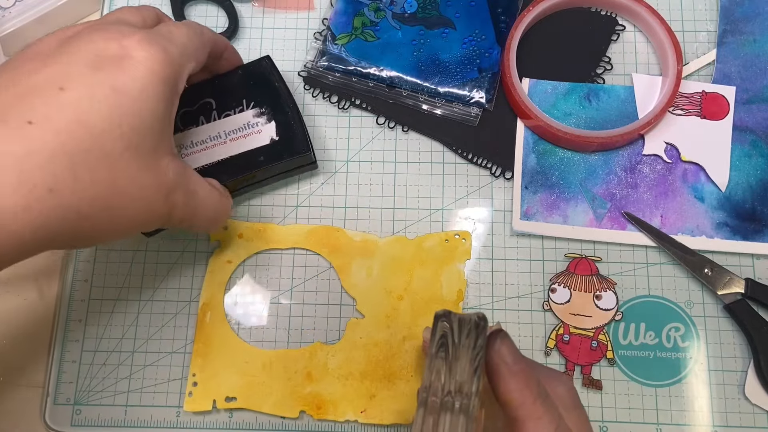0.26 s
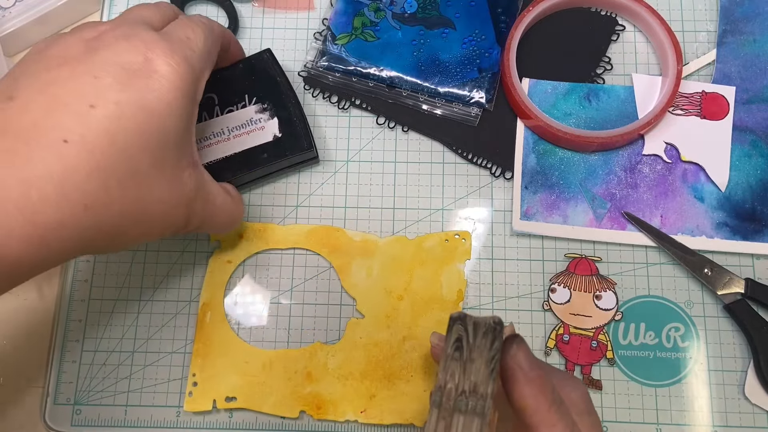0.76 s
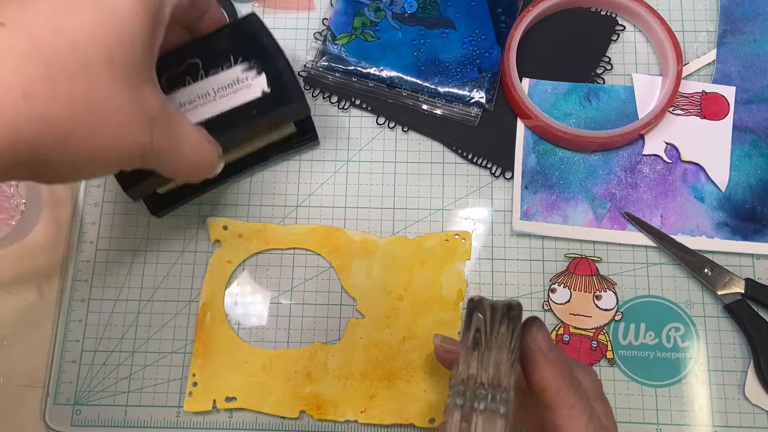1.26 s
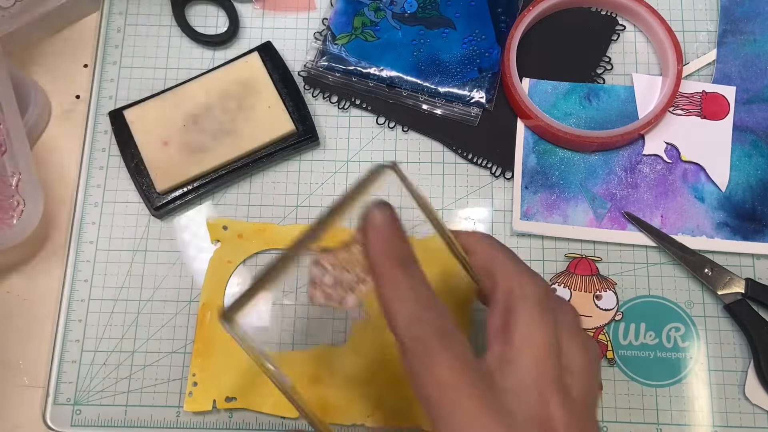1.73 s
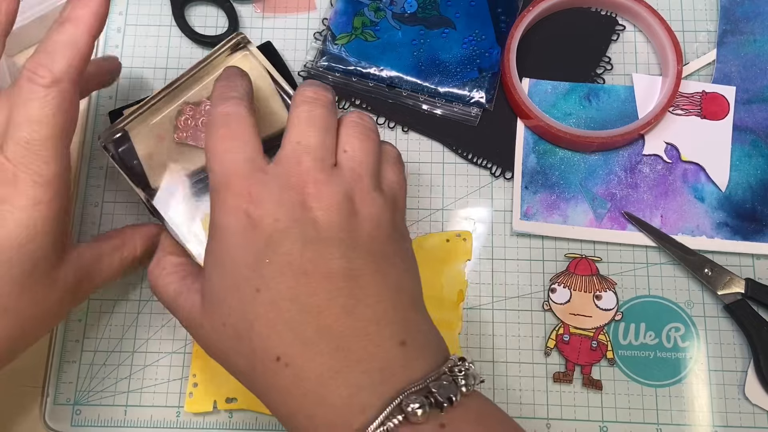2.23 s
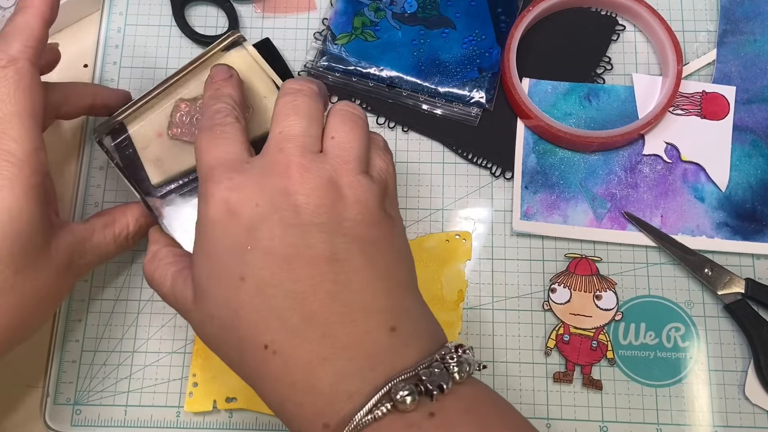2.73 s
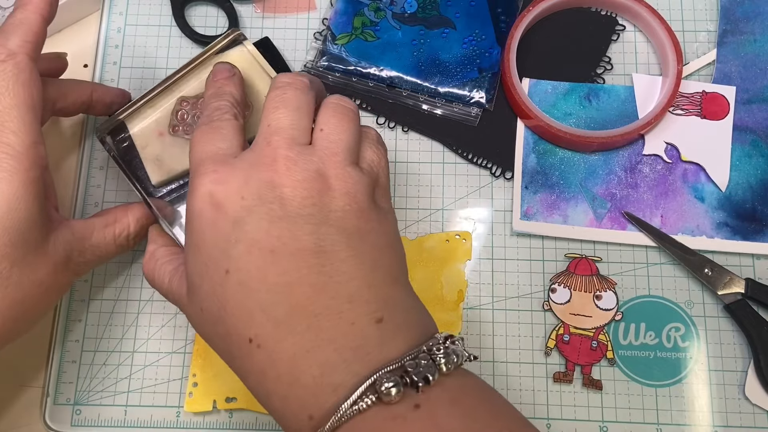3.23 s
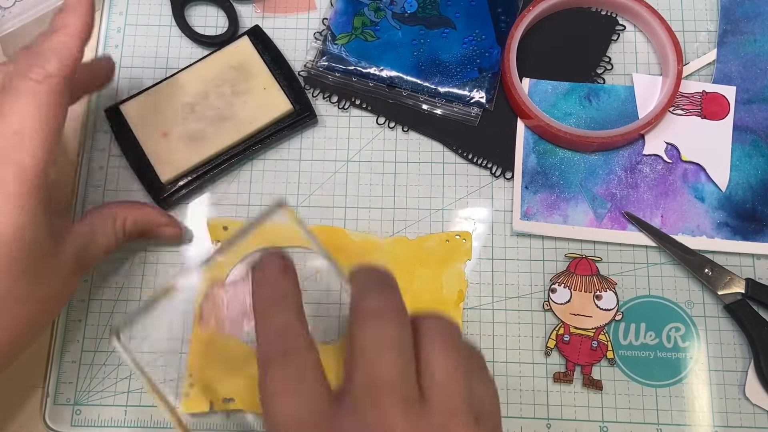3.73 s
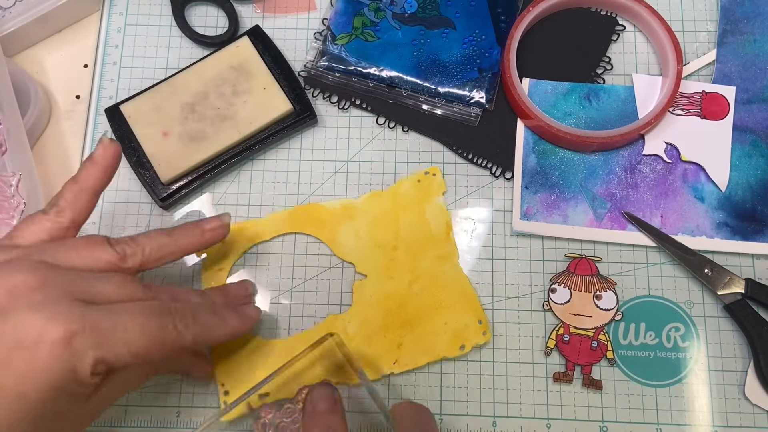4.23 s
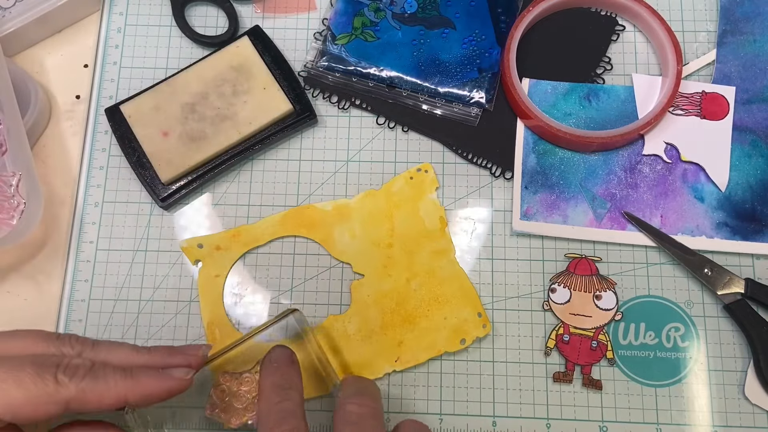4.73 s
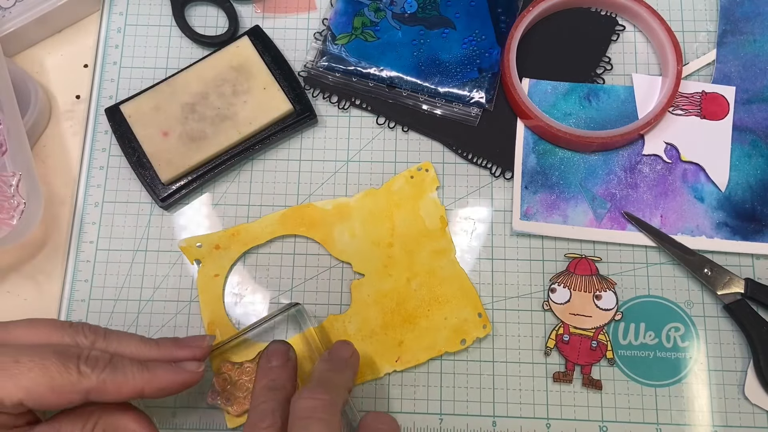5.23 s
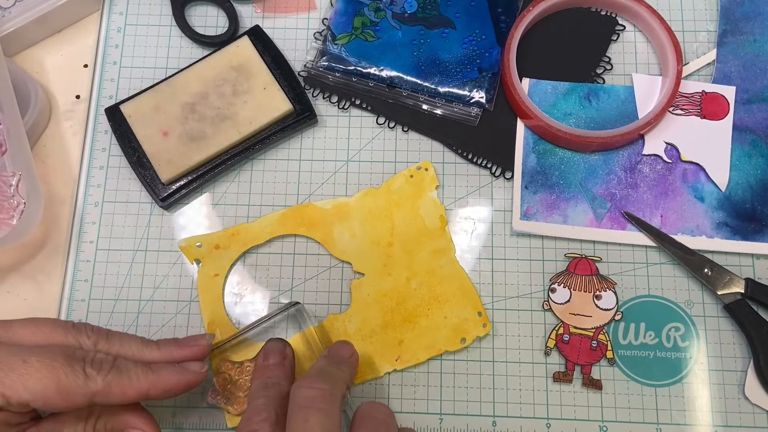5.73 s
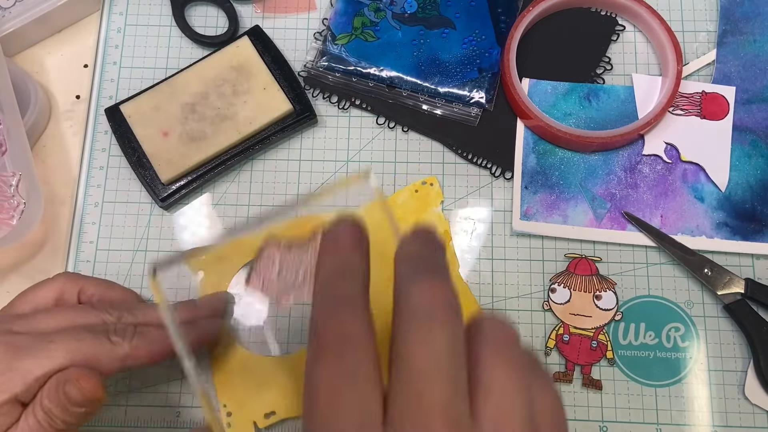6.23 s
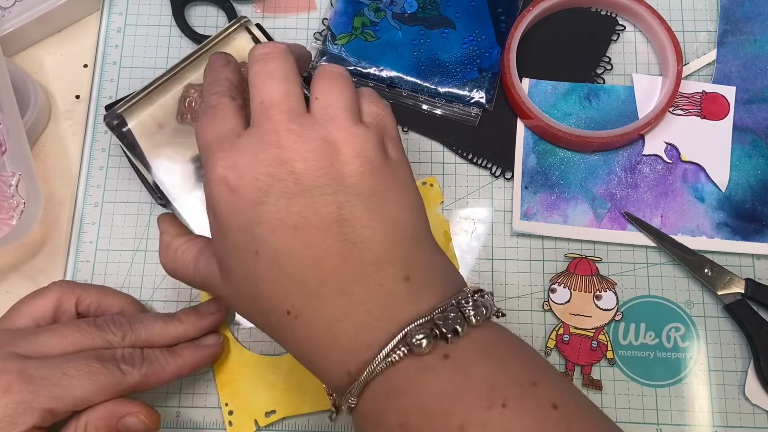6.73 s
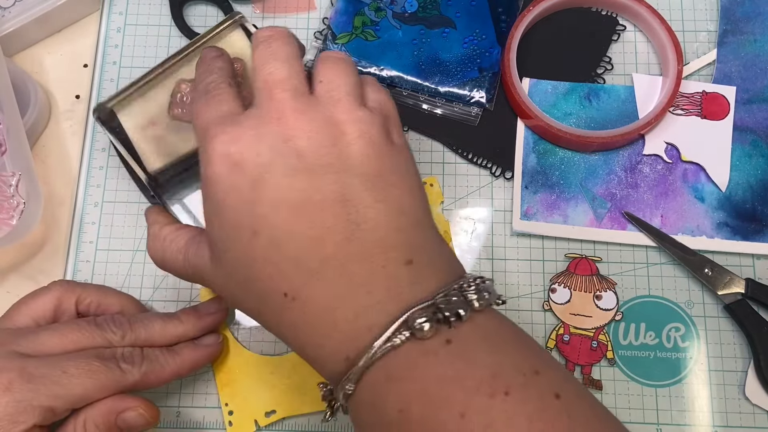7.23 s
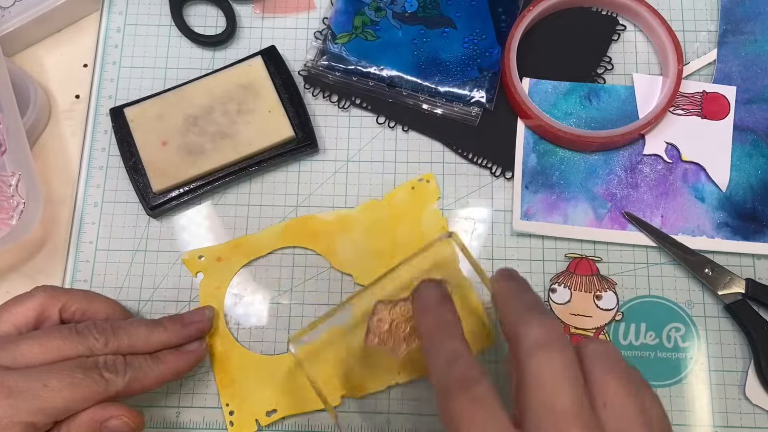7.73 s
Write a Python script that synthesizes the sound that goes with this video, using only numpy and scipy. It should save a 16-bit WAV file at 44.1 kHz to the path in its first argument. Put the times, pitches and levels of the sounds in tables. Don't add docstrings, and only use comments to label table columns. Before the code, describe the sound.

Close microphone on a craft desk. Faint handling taps, then crisp plastic cracks with low desk thuds, followed by a lid clattering and settling within a third of a second. Light cloth brushing and tiny metal ticks fill the gaps. A clear block lands lightly, later knocks hard once; bracelet links scrape and snap, then the block clicks, rubs briefly and double-knocks the rim. Low room air throughout, short dry echo.

```python
import sys
import numpy as np
from scipy import signal
from scipy.fft import rfft, irfft, next_fast_len
from scipy.io import wavfile
from scipy.ndimage import uniform_filter1d

SR = 44100
rng = np.random.default_rng(int(sys.argv[2]) if len(sys.argv) > 2 else 0)


def wrap_up_sound(samples):
    columns = np.atleast_2d(samples).T
    tamed = np.clip(columns, -1, 1)
    steps = np.round(tamed * 32767).astype(np.int16)
    wavfile.write(sys.argv[1], SR, steps)


def decibels_to_gain(level_db):
    exponent = np.asarray(level_db, float) / 20
    return 10 ** exponent


N = 351918
HELD_T60, FREE_T60 = .022, .07

# (t/s, peak level/dB, body level/dB, edge level/dB, hollow f/Hz)
PRIES = [
    (1.031, -61, 22.12, -5, 866),
    (1.0375, -57, 28.78, -11, 890),
    (1.0405, -51, 29, -12, 880),
]
# (t/s, peak level/dB, body level/dB, edge level/dB, hollow f/Hz)
CASE_KNOCKS = [(0.1102, -34.5, 10.5, -42, 1860), (0.117, -42.5, 15, -36, 1980),
               (0.3043, -42, 10, -46, 1980), (1.1825, -16, 3.5, -1.5, 1494), (1.1853, -17, 5, -5, 1620),
               (1.1995, -31.5, 2, -32, 1990), (1.2385, -21.5, 5.5, 1, 1600), (1.2425, -23.5, -4, -4, 1600),
               (1.255, -33.5, 3, -28, 1530), (1.2668, -34.5, -0.5, -5, 1800),
               (1.2718, -25, 7.5, -0.5, 1600), (1.2875, -31.5, 1, -1, 1496), (1.2922, -21.5, 5.5, -7, 1647)]
# (f/Hz, level/dB, t60/s)
CASE_RING = [(790, -6, .02), (1130, -6, .03), (1610, 0, .03), (1990, -5, .03), (2700, -7, .02),
             (3160, -6, .025), (3950, -2, .014), (4500, -5, 0.014), (5400, -6, .02), (6200, -8, .022),
             (8400, -12.5, .02), (10000, -7.5, .02)]
# (t/s, peak level/dB, body level/dB, edge level/dB, hollow f/Hz)
LID_DROP = [
    (1.6908, -12.5, -12, -2, 1130),
    (1.6933, -14, -2, -5.5, 1000),
    (1.6978, -21, -12, -10, 1520),
    (1.7057, -18.5, -10.5, -15, 1130),
]
# (f/Hz, level/dB, t60/s)
DROP_RING = [(890, -10, .03), (1135, -8, .045), (1520, -8, .03), (2024, -7, .05), (2400, -7, .05),
             (2732, -7, .05), (3000, -2, .015), (3370, -7, .05), (3730, 6, .018), (5233, -6, .04),
             (5706, -5, .04), (6207, -8, .04), (9615, -7, .04), (9959, -5, .04)]
# (t/s, peak level/dB, body level/dB, edge level/dB, hollow f/Hz)
LID_TIPS = [
    (1.7405, -20.5, -9, -36, 1500),
    (1.7515, -33, -8, -34.5, 870),
    (1.7655, -29, -6, -36.5, 1500),
]
# (f/Hz, level/dB, t60/s)
TIP_RING = [(861, -4, .07), (1104, -6, .06), (2089, -7, .045), (2762, -1, .05), (3144, -4, .06),
            (3763, -7, .06), (3941, 0, .03), (4544, -1, .04), (5722, -6, .06), (8452, -14, .03),
            (9798, -12, .03)]
# (t/s, peak level/dB, body level/dB, edge level/dB, hollow f/Hz)
LID_BOUNCES = [
    (1.7835, -11, -7, -1.5, 1896),
    (1.8038, -11.5, -8, -10, 1130),
    (1.8304, -19.5, -12, -17, 1418),
    (1.8345, -23.5, -15, -19.5, 1450),
    (1.844, -33, -12, -19, 1463),
]
# (f/Hz, level/dB, t60/s)
BOUNCE_RING = [(1130, -11, .025), (1950, -6, .03), (2850, -11, .025), (3110, -6, .03), (3378, -4, .06),
               (3900, -7, .02), (5050, -5, .055), (5730, -3, .04), (6240, -7, .045), (8530, -12, .03),
               (9150, -10, .04), (5980, -6, .04), (7090, -6, .03), (11500, -12, .02)]
# (t/s, peak level/dB, body level/dB, edge level/dB, hollow f/Hz)
LID_RESTS = [
    (1.8638, -21.5, -7.5, -22, 1950),
    (1.8722, -17.5, -11, -10, 1980),
    (1.888, -34, -7, -23, 1950),
    (1.9045, -23.5, -7, -15, 2000),
    (1.92, -35.5, -5, -29, 1950),
]
# (f/Hz, level/dB, t60/s)
REST_RING = [(1130, -1.5, .03), (2020, -3.5, .03), (2790, -2.5, .03), (3590, 4, 0.025), (4140, -3, .03),
             (4800, -9, .03), (5868, 0, .03), (6480, -3, .03), (8470, -10, .03), (10240, -15.5, .03),
             (12320, -15.5, .03)]
# (t/s, peak level/dB, body level/dB, edge level/dB, hollow f/Hz)
LID_TOUCHES = [
    (1.6405, -53, 7, -24.5, 1400),
    (1.9424, -49.5, 8.5, -35, 1600),
    (1.9785, -34, -2.5, -45.5, 1960),
    (1.992, -48, 4, -34, 1920),
    (2.012, -52.5, 9.5, -32, 1900),
    (2.033, -54, 2.5, -33, 1190),
    (2.07, -51, -0.5, -32, 1170),
]
# (f/Hz, level/dB, t60/s)
TOUCH_RING = [(800, -9.5, .03), (1130, -4, .03), (2060, 1, .03), (2680, -2, .03), (3150, -2, .03),
              (3750, -3, .02), (4550, -4.5, .03), (5230, -5, .03), (5700, -5, .03), (8860, -14, .03),
              (10018, -6, .03), (11400, -6.5, .03)]
# (t/s, peak level/dB, body level/dB, edge level/dB, hollow f/Hz)
BLOCK_FLAT = [
    (2.7043, -25, 8, 2, 1117),
    (2.7085, -30, -4, -5.5, 1156),
    (2.7135, -36, 4.5, -9, 1124),
]
# (f/Hz, level/dB, t60/s)
FLAT_RING = [(790, -5, .02), (1146, 0, .03), (1345, -6, .02), (1880, -3, .02), (2400, -6, .02),
             (2690, -4, .02), (3170, -6, .03), (3450, -5, .03), (3890, -1, .02), (4410, -5, .03),
             (5120, -4, .03), (8090, 1, .03), (9630, -4.5, .03), (11460, -6, .03)]
# (t/s, peak level/dB, body level/dB, edge level/dB, hollow f/Hz)
BLOCK_KNOCKS = [
    (3.5028, -11.5, -1, -2.5, 1492),
    (3.5075, -24, 0.5, 4, 1600),
    (3.5149, -20, 0.5, -4, 790),
    (4.9926, -55, 6.5, -35, 1193),
    (5.2195, -68.5, 19, -29, 1197),
]
# (f/Hz, level/dB, t60/s)
BLOCK_RING = [(790, -4.5, .03), (1130, -5.5, .03), (1600, -4, .03), (1860, 0, .03), (2400, -1, .03),
              (2726, 0.5, .03), (3460, -8, 0.022), (4000, 5.5, .012), (4756, -9, .015), (5600, -3, 0.03),
              (6600, -5, .02), (8430, -6, .03), (10030, -6.5, .03), (11500, -3, .03)]
# (t/s, peak level/dB, body level/dB, edge level/dB, hollow f/Hz)
BLOCK_CORNER = [
    (6.9422, -52, 9, -28.5, 1557),
    (7.048, -67.5, 22, -35, 1500),
    (7.0675, -18.5, 6, -2.5, 1530),
    (7.072, -28, -6, 1, 1860),
]
# (f/Hz, level/dB, t60/s)
CORNER_RING = [(770, -9, .03), (1178, -8, .03), (1504, -0.5, .03), (1924, 4, .02), (2890, -9, .02),
               (3200, -12, .015), (3720, 2, .014), (4094, 2, .012), (4730, -5, .015), (5580, -5, .02),
               (8550, 2, .03), (9900, -4, .03)]
# (t/s, peak level/dB, body level/dB, edge level/dB, hollow f/Hz)
RIM_KNOCKS = [
    (7.3836, -8.5, -11, -13, 1700),
    (7.394, -9, -7, -9.5, 1857),
    (7.4015, -23, -8.5, -13.5, 2020),
]
# (f/Hz, level/dB, t60/s)
RIM_RING = [(795, 0, .03), (1125, -14, .02), (1650, -6, .02), (2030, -1, .022), (2460, -2, .015),
            (2875, -5, .03), (3480, -5, .015), (3930, 3, .016), (4250, 1, .012), (5170, -1, .025),
            (5600, -6, .015), (6660, -10, .015), (8500, -10, .03), (9900, -9, .03)]
# (t/s, peak level/dB, body level/dB, edge level/dB, hollow f/Hz)
RIM_SETTLES = [(7.4205, -28.5, -12.5, -25, 2100), (7.4255, -25, -5, -20, 2070),
               (7.441, -25.5, -7, -14, 1630), (7.4445, -24, 0.5, 0, 1710), (7.4475, -25, -3.5, -2.5, 1600),
               (7.4525, -28.5, -4, -14, 1900), (7.4625, -37.5, 1, -21, 1610), (7.469, -41.5, 2, -21, 1790)]
# (f/Hz, level/dB, t60/s)
SETTLE_RING = [(797, -6, .03), (1600, -4, .02), (1938, -2, .02), (2860, -2, .03), (3400, -3, .02),
               (3680, -2, .02), (4600, -5, .015), (5400, -7, .02), (5840, -5, .02), (8500, -11, .03),
               (9615, -13, .03), (9960, -10, .03), (11500, -10, .03)]
# (f/Hz, level/dB)
SQUEAL_NOTES = [(2120, 0), (3500, -10), (4250, -8), (5300, -6)]
# (f/Hz, level/dB, t60/s)
DESK_RING = [(788, 0, .06), (1135, -1, .05), (1605, -2, .045), (1865, -2, .045), (2025, -5, .04),
             (2730, -7, .04), (2865, -4, .045), (3150, -5, .04), (3945, -7, .03), (5230, -8, .03),
             (8400, -2, .03), (9615, -2, .04), (9958, -4, .04)]
# (t/s, peak level over 7.5 kHz/dB, lower level/dB)
CHARM_TICKS = [(2.0582, -45, -1), (2.081, -40.5, -11), (2.0954, -56, 11), (2.2583, -46.5, -3.5),
               (3.1087, -59.5, -9), (3.1892, -61.5, -5.5), (3.3226, -60, -10), (3.7534, -52, -3.5),
               (5.1278, -53, -2), (6.1567, -48, -25), (6.1784, -58, -7.5), (6.2532, -52, -5),
               (6.3261, -57, -8.5), (6.4513, -50.5, -8.5), (6.474, -58.5, -3), (6.5046, -55, -11.5),
               (6.5514, -53, -16), (6.6288, -61, -11.5), (7.2604, -56.5, -2.5), (7.2877, -54.5, -3),
               (7.5945, -56, -4), (7.6045, -56.5, -8), (7.6833, -62, -1), (7.7056, -51.5, -15),
               (7.7445, -60.5, -11), (7.8344, -69.5, -1)]
# (t/s, peak level over 7.5 kHz/dB, lower level/dB, desk knock level/dB)
BRACELET_DRAG = [(5.8621, -36, -8, -9.5), (5.93, -44, -13, -25.5), (5.9373, -39.5, 0.5, -31),
                 (5.9425, -29.5, -8, -9), (5.9575, -44, -5, -25), (5.969, -30, -29, -22),
                 (5.9787, -34, -10, -25), (5.9818, -29, -8, -18), (5.991, -32, -6, -20),
                 (6.0365, -55, 3, -7), (6.0405, -46, -16, -8)]
# (t/s, peak level over 7.5 kHz/dB, lower level/dB, desk knock level/dB)
SNAPS = [
    (5.9848, -19, -7, -10),
    (7.7569, -35, -14, -30),
]
# (t/s, peak level/dB, f/Hz, t60/s)
THUDS = [(1.051, -28.5, 74, 0.08), (1.189, -22.5, 67, 0.12), (1.241, -23, 65, 0.17),
         (1.289, -34.5, 63, 0.16), (1.699, -33, 69, 0.25), (1.798, -38, 61, 0.27), (1.883, -41, 66.5, 0.13),
         (2.266, -40, 85.3, 0.19), (2.708, -31.5, 107.7, 0.12), (3.514, -19, 72, 0.086),
         (5.024, -42.5, 73.6, 0.31), (5.14, -31.5, 64.9, 0.16), (5.175, -40, 110, 0.12),
         (5.229, -45, 79.7, 0.18), (5.954, -36, 76, 0.27), (6.67, -33, 81, 0.21), (6.715, -42, 105, .13),
         (7.07, -35, 102.5, 0.062), (7.404, -34, 70.6, 0.24)]
# (middle t/s, length/s, level/dB)
STROKES = [(1.116, 0.26, -62.5), (1.483, 0.44, -66), (1.667, 0.12, -53), (2.076, 0.31, -66),
           (2.272, 0.23, -58.5), (2.633, 0.17, -61.5), (3.124, 0.11, -67), (3.33, 0.077, -77),
           (3.458, 0.097, -59.5), (3.641, 0.18, -70), (3.798, 0.6, -64), (4.035, .12, -68),
           (4.176, 0.23, -66.5), (4.509, 0.63, -69.5), (5.121, 0.049, -75), (5.579, 0.095, -86),
           (5.824, 0.15, -68.5), (6.077, 0.095, -74.5), (6.196, 0.16, -65), (6.334, 0.2, -64),
           (6.462, 0.25, -64), (6.57, 0.076, -73.5), (6.703, 0.32, -72), (6.959, 0.22, -67),
           (7.28, 0.16, -67), (7.551, 0.2, -57), (7.72, 0.17, -64), (7.907, .3, -66.5)]
# (f/Hz, level per Hz/dB)
RUSTLE_TONE = [(1500, -30), (4000, -10), (6000, -3), (9000, 0), (12000, 0), (14500, 4), (16000, 5)]
# (f/Hz, t60/s)
ROOM = [(200, 0.62), (1000, 0.086), (3000, 0.18), (6000, 0.135), (12000, 0.095)]
# (f/Hz, level per Hz/dB)
AIR = [(25, -37), (45, -16), (67, 2.5), (90, -10.5), (150, -14), (280, -7), (360, -7.5), (520, -10.5),
       (750, -19), (1000, -26), (2200, -28.5), (5000, -38.5), (8000, -52), (14000, -61)]
# (t/s, level/dB)
AIR_DRIFT = [(0, 2.5), (.8, 1.5), (2.3, 2.4), (3.3, 1.5), (4.1, -0.2), (5, 0.33), (6.2, 1.3), (7.2, 2.4),
             (7.98, 1.5)]
# (f/Hz, width/Hz, level/dB)
NOTCHES = [(7330, 750, -22), (13450, 700, -28), (15500, 5000, -4)]


def evened(x):
    return x / np.sqrt(np.mean(x ** 2) + 1e-20)


def peaked(x):
    return x / np.sqrt(uniform_filter1d(x ** 2, size=128).max() + 1e-20)


def read(points, hz):
    f, value = np.transpose(points)
    return np.interp(np.log(hz + 1), np.log(f + 1), value)


def add(mix, s, sound):
    part = mix[round(s * SR):][:len(sound)]
    part += sound[:len(part)]


def band(x, hz, kind="band"):
    return signal.sosfilt(signal.butter(2, hz, kind, fs=SR, output="sos"), x)


def levelled(grit, shape):
    x = grit * shape
    for _ in range(3):
        z = rfft(x)
        x = irfft(z / (abs(z) + 1e-12))
        x = shape * x / np.sqrt(abs(uniform_filter1d(x ** 2, size=24)) + 1e-14)
    return x


def knocks(rows, modes, crack_db, hollow_db, longest, chatter_ms, swell_db=-25, dull_db=0, wood_db=-30, loose=.35):
    out, t, lead = np.zeros(N), np.arange(3584) / SR, .025
    hz, db, t60 = np.transpose(modes)[:, :, None]
    ring = decibels_to_gain(db - 60 * t / np.clip(t60, .008, longest * np.minimum(1, 5000 / hz)))
    since = np.maximum(t - lead, 0)
    for s, peak_db, body_db, edge_db, hollow_hz in rows:
        spot, phase = rng.standard_normal((2, len(modes), 1))
        grit = rng.standard_normal(len(t)) * decibels_to_gain(3 * rng.standard_normal(len(t)))
        push = np.exp(-1000 * since / chatter_ms) + decibels_to_gain(-15) * np.exp(-since / .015)
        chatter = levelled(grit, push * (1 - np.exp(-since / .0005)))
        blow = 2.1 * chatter / np.linalg.norm(chatter)
        blow += .7 * signal.unit_impulse(len(t), round(lead * SR) + 20)
        notes = ring * decibels_to_gain(1.3 * spot) * np.sin(2 * np.pi * (hz * t + .12 * phase))
        rung = signal.fftconvolve(blow, notes.sum(0))[:len(t)]

        def layer(low, high, dull=0):
            crack = decibels_to_gain(crack_db + low / 1500 + dull) * peaked(band(chatter, [low, high]))
            return peaked(band(rung, [low, high])) + crack

        body, bright, edge = layer(650, 1550, dull_db), layer(1900, 7000), layer(7600, 17000)
        hollow = np.sin(2 * np.pi * hollow_hz * since) * decibels_to_gain(-60 * since / .014)
        hollow = peaked(hollow * (1 - np.exp(-since / .0012)))
        body = peaked(band(body, 620, "high")) + decibels_to_gain(hollow_db) * hollow
        body *= loose + (1 - loose) * np.exp(-since / .0013)
        swell = grit * (t < lead) * np.exp(np.minimum(t - lead, 0) / .0058)
        swell = decibels_to_gain(swell_db) * peaked(band(swell, [1500, 5500]))
        mat = grit * (t > lead) * np.exp(-since / .022)
        mat = decibels_to_gain(wood_db + body_db) * peaked(band(mat, [240, 620]))
        knock = peaked(bright) + swell + mat
        knock -= decibels_to_gain(body_db) * peaked(body) + decibels_to_gain(edge_db) * peaked(edge)
        add(out, s - lead, decibels_to_gain(peak_db) * knock)
    return out


def case_knocks():
    return knocks(CASE_KNOCKS, CASE_RING, -.5, 0, HELD_T60, chatter_ms=3.2, wood_db=-22.5)


def case_pries():
    return knocks(PRIES, CASE_RING, -2.5, 7, HELD_T60, chatter_ms=2, loose=.7)


def lid_drop():
    out = knocks(LID_DROP, DROP_RING, -.5, -2, FREE_T60, chatter_ms=3.3, wood_db=-14.5, loose=.3)
    return out + knocks(LID_TIPS, TIP_RING, -5.5, -3, FREE_T60, chatter_ms=4.2, wood_db=-21.5, loose=.6)


def lid_touches_and_bounces():
    out = knocks(LID_TOUCHES, TOUCH_RING, -1, -1, 1.9 * HELD_T60, chatter_ms=5, wood_db=-16.5)
    return out + knocks(LID_BOUNCES, BOUNCE_RING, -5, -3, FREE_T60, chatter_ms=5.43, dull_db=-2.5)


def lid_rests():
    return knocks(LID_RESTS, REST_RING, -6, -3, HELD_T60, chatter_ms=5.8)


def lid_rattle():
    start, end, count = 1.71, 1.96, 12
    when, size = rng.random((count, 2)).T
    part = (np.arange(count) + when) / count
    peak_db = -30 - 12.5 * part ** 2 - 7 * size
    rows = [(start + p * (end - start), db, -10, -22, 900) for p, db in zip(part, peak_db)]
    return knocks(rows, BOUNCE_RING, 2.5, -6.5, HELD_T60, chatter_ms=5.2)


def block():
    out = knocks(BLOCK_KNOCKS, BLOCK_RING, -.5, -1, HELD_T60, chatter_ms=3.2, wood_db=-14, loose=.4)
    out += knocks(BLOCK_FLAT, FLAT_RING, -1, 2.5, 1.3 * HELD_T60, chatter_ms=2.4, wood_db=-21, loose=.36)
    return out + knocks(BLOCK_CORNER, CORNER_RING, -1.5, -4.5, HELD_T60, chatter_ms=3.1, wood_db=-21.5, loose=.12)


def rim_knocks():
    return knocks(RIM_KNOCKS, RIM_RING, -.5, -1, HELD_T60, chatter_ms=2.3,
                  swell_db=-29, dull_db=-14.5, wood_db=-15.5)


def rim_settles():
    return knocks(RIM_SETTLES, SETTLE_RING, 3, 2, 2 * HELD_T60, chatter_ms=2.5, dull_db=-9.5)


def squeal():
    start, end, final_db, rise_db = 7.36, 7.384, -32, 22
    out, t = np.zeros(N), np.arange(0, end - start, 1 / SR)
    notes = np.zeros(len(t))
    for hz, db in SQUEAL_NOTES:
        notes += decibels_to_gain(db) * evened(band(rng.standard_normal(len(t)), [.975 * hz, 1.025 * hz]))
    add(out, start, decibels_to_gain(final_db - rise_db * (1 - t / t[-1])) * np.minimum(t / .004, 1) * notes)
    return out


def desk_ring(x):
    hz, db, t60 = np.transpose(DESK_RING)[:, :, None]
    t = np.arange(4096) / SR
    notes = decibels_to_gain(db - 60 * t / t60) * np.cos(2 * np.pi * hz * t)
    notes *= 2 * np.log(1000) / (SR * t60)
    return x + signal.oaconvolve(x, notes.sum(0))[:N]


def charms(rows, tick_ms, fizz_db=-10):
    out, t = np.zeros(N), np.arange(2048) / SR
    for s, peak_db, low_db, *knock_db in rows:
        fall = np.exp(-1000 * t / tick_ms) + decibels_to_gain(fizz_db) * np.exp(-t / .014)
        grit = rng.standard_normal(len(t)) * fall
        tick = peaked(band(grit, 7500, "high"))
        tick += decibels_to_gain(low_db) * peaked(band(grit, [4500, 7000]))
        tick += decibels_to_gain(knock_db).sum() * peaked(band(grit, [1750, 3900]))
        add(out, s, decibels_to_gain(peak_db) * tick)
    return out


def bracelet():
    out = charms(CHARM_TICKS, tick_ms=1.1) + charms(BRACELET_DRAG, tick_ms=1.6)
    return out + charms(SNAPS, tick_ms=.5, fizz_db=-26)


def desk():
    out, t = np.zeros(N), np.arange(SR // 2) / SR
    for s, peak_db, hz, t60 in THUDS:
        rumble = evened(band(band(rng.standard_normal(len(t)), 280, "low"), [120, 330]))
        swing = np.sin(2 * np.pi * hz * t) + decibels_to_gain(-8 - 150 * t) * rumble
        push = 1 - np.exp(-t / .009)
        add(out, s, decibels_to_gain(peak_db) * peaked(swing * decibels_to_gain(-60 * t / t60) * push))
    return band(band(out, 42, "high"), 45, "high")


def hiss(tone, patchy_db, size, standing_db=0):
    hz = np.fft.rfftfreq(size, 1 / SR)
    a, b, patches = rng.standard_normal((4 * N // size + 5, len(hz), 3)).T
    patches = evened(uniform_filter1d(uniform_filter1d(patches, size=4, axis=0), size=8, axis=1))
    standing = standing_db * evened(uniform_filter1d(rng.standard_normal(len(hz)), size=2))[:, None]
    z = (a + 1j * b) * decibels_to_gain(standing + read(tone, hz)[:, None] + patchy_db * patches)
    return evened(signal.istft(z, nperseg=size, noverlap=size * 3 // 4)[1][:N])


def rustle():
    t = np.arange(N) / SR
    level = np.full(N, decibels_to_gain(-106))
    for s, length, db in STROKES:
        near = slice(round((s - length) * SR), round((s + length) * SR))
        level[near] += decibels_to_gain(db) * np.exp(-(3 * (t[near] - s) / length) ** 2)
    grain = decibels_to_gain(2.7 * evened(uniform_filter1d(rng.standard_normal(N), size=400)))
    return level * evened(grain * hiss(RUSTLE_TONE, patchy_db=3, size=512))


def card_slide():
    middle, length, hz = 4.16, .13, 5900
    t = np.arange(N) / SR
    swish = evened(band(rng.standard_normal(N), [.9 * hz, 1.04 * hz]))
    return decibels_to_gain(-73) * swish * np.exp(-(2 * (t - middle) / length) ** 4)


def tail():
    taps = np.zeros(SR // 2)
    at = np.arange(120, len(taps) - 20, 20)
    taps[at + rng.integers(0, 20, len(at))] = rng.choice([-1., 1.], len(at))
    hz, t, z = signal.stft(taps, SR, nperseg=256)
    fall_db = -60 * t / read(ROOM, hz)[:, None]
    fall = decibels_to_gain(fall_db) + decibels_to_gain(-23 + fall_db / 1.6)
    z = rfft(signal.istft(z * fall, SR, nperseg=256)[1][:len(taps)])
    cap = 1.1 * uniform_filter1d(abs(z), size=300)
    even = irfft(z * np.minimum(1, cap / (abs(z) + 1e-20)))[:len(taps) // 2]
    even[:101] = 0
    return even / np.linalg.norm(even)


def room(x):
    spots, spots_per_s = 2, 17
    turn = np.pi * spots_per_s * np.arange(N) / SR / spots
    wobble = evened(uniform_filter1d(uniform_filter1d(rng.standard_normal(N), size=90), size=90))
    blurred = (signal.hilbert(x, next_fast_len(N))[:N] * np.exp(2.6j * wobble)).real
    out = np.zeros(N)
    for k in range(spots):
        share = np.sqrt(2 / spots) * np.cos(turn + np.pi * k / spots)
        out += signal.fftconvolve(blurred * share, tail())[:N]
    return out


def air():
    drift_db = np.interp(np.arange(N) / SR, *np.transpose(AIR_DRIFT))
    return decibels_to_gain(-50.5 + drift_db) * hiss(AIR, patchy_db=1.5, size=4096, standing_db=1.8)


def scene():
    hits = case_knocks() + lid_touches_and_bounces() + block() + lid_rests() + rim_knocks()
    hits += lid_rattle() + case_pries() + lid_drop() + rim_settles() + squeal()
    hits *= decibels_to_gain(-1.5)
    ticks = bracelet()
    bed = air()
    echoes = room(decibels_to_gain(-12) * hits + decibels_to_gain(-17) * ticks)
    return (desk_ring(hits) + ticks + echoes + desk() + rustle() + card_slide() + bed)[None]


def roll_off(x):
    return signal.sosfilt(signal.butter(12, 17000, fs=SR, output="sos"), x)


def record(dry):
    hz = np.fft.rfftfreq(4096, 1 / SR)
    colour_db = sum(db / (1 + (2 * (hz - f) / width) ** 2) for f, width, db in NOTCHES)
    colour_db = np.maximum(colour_db - .06 * np.maximum(hz - 15750, 0), -80)
    full = np.log(decibels_to_gain(np.r_[colour_db, colour_db[-2:0:-1]]))
    taps = np.fft.ifft(np.exp(np.conj(signal.hilbert(full)))).real[:2048]
    x = signal.fftconvolve(dry, taps[None], axes=1)[:, :N]
    power_db = 10 * np.log10(abs(uniform_filter1d(x[0] ** 2, size=900)) + 1e-12)
    fall = np.arange(N) * 74 / SR
    over_db = np.maximum(np.maximum.accumulate(power_db + fall) - fall + 5.5, 0)
    duck = decibels_to_gain(-.25 * signal.lfilter([.002], [1, -.998], over_db))
    return roll_off(np.clip(x * duck, -1, 1))


dry = scene()
out = record(dry)
wrap_up_sound(out)
```